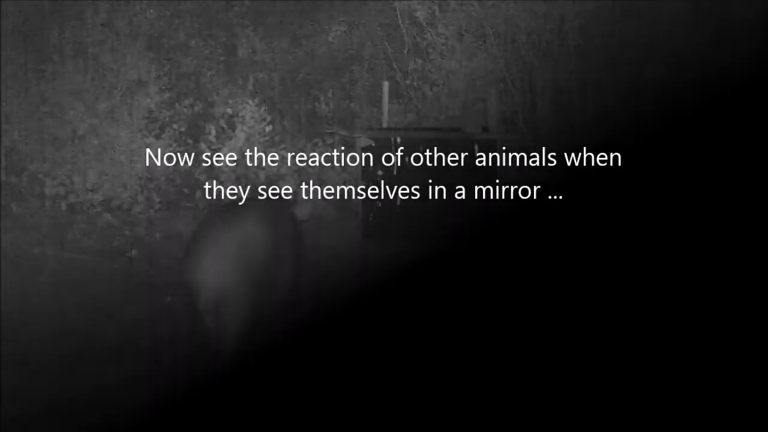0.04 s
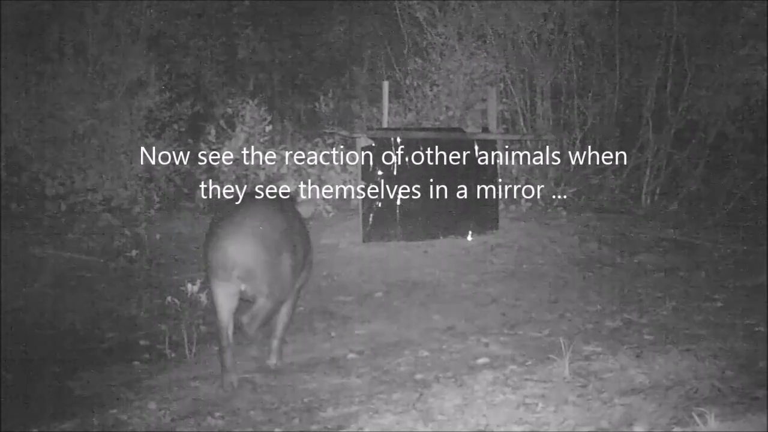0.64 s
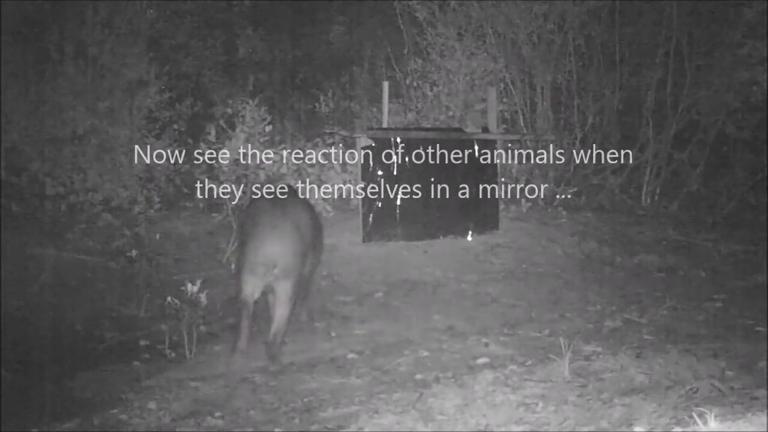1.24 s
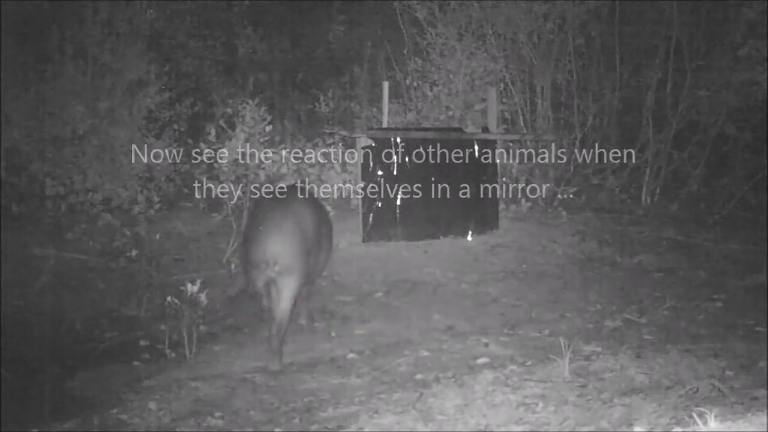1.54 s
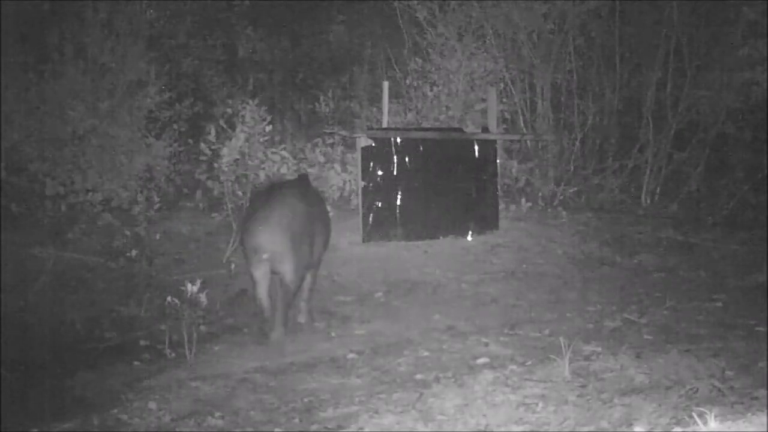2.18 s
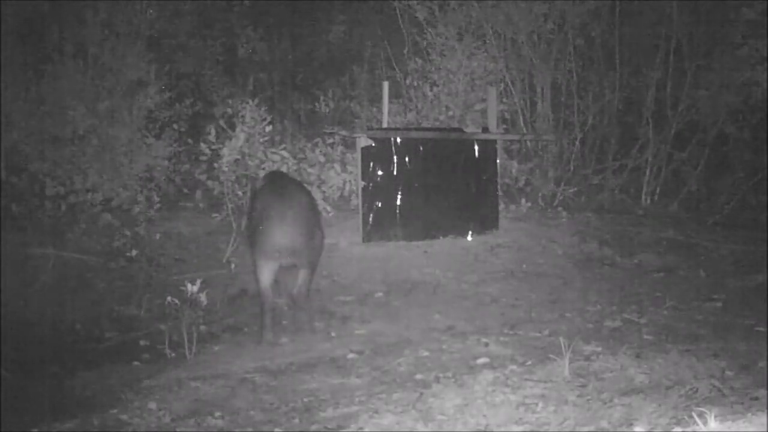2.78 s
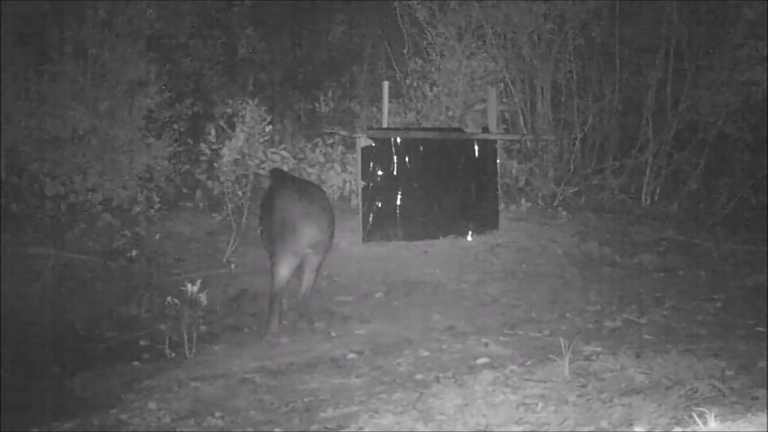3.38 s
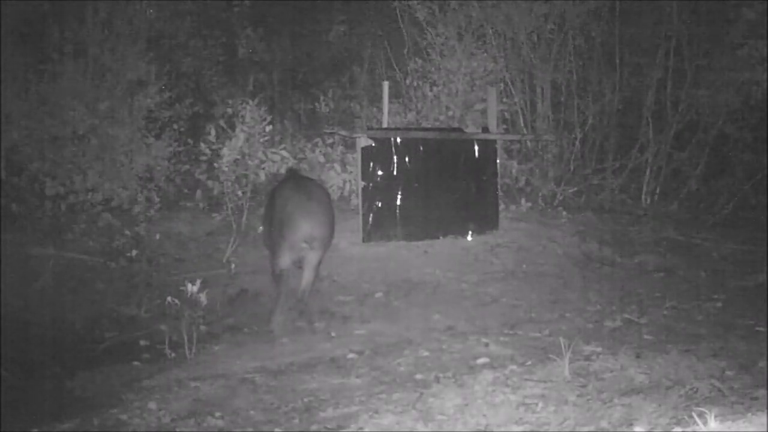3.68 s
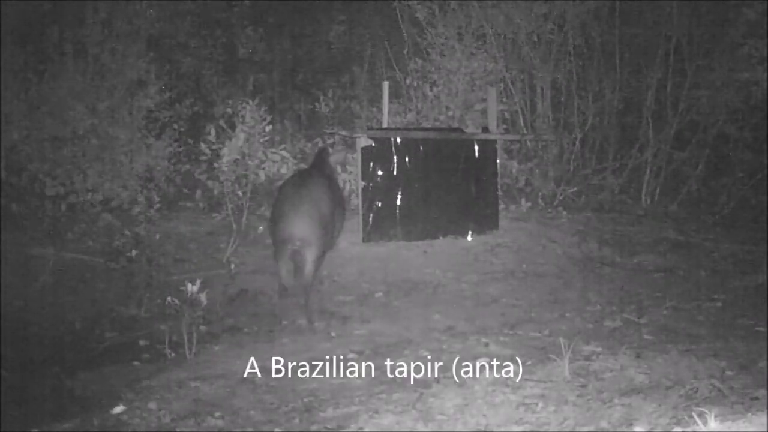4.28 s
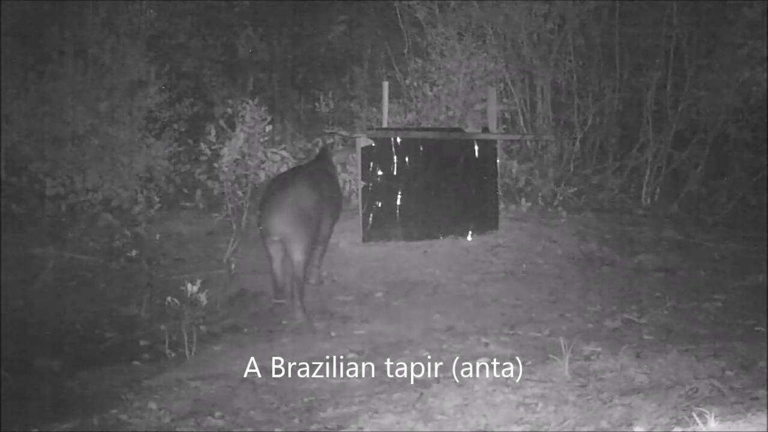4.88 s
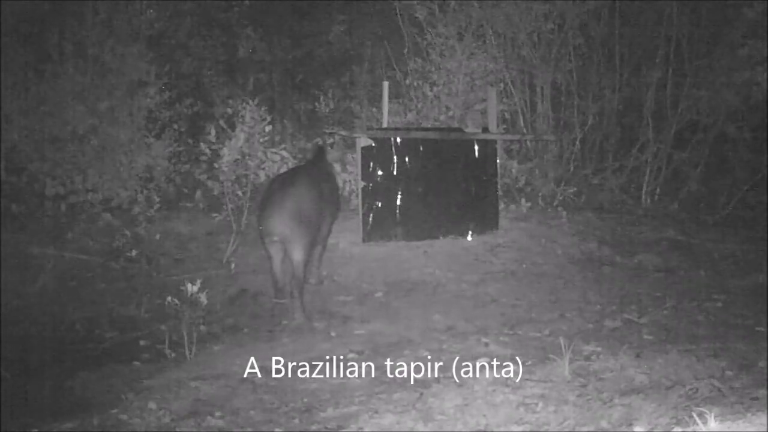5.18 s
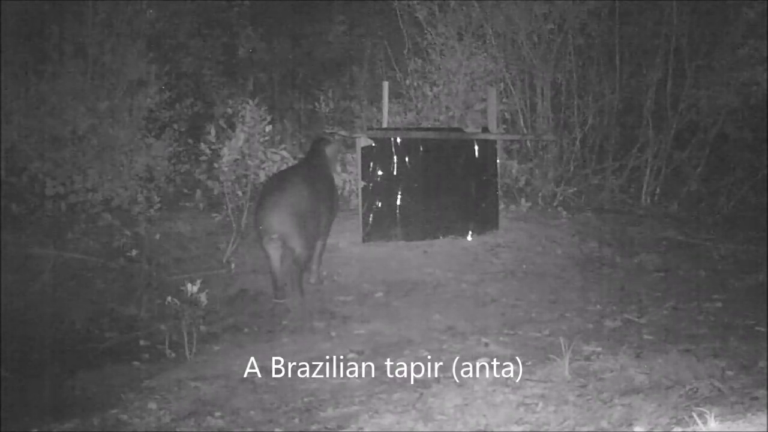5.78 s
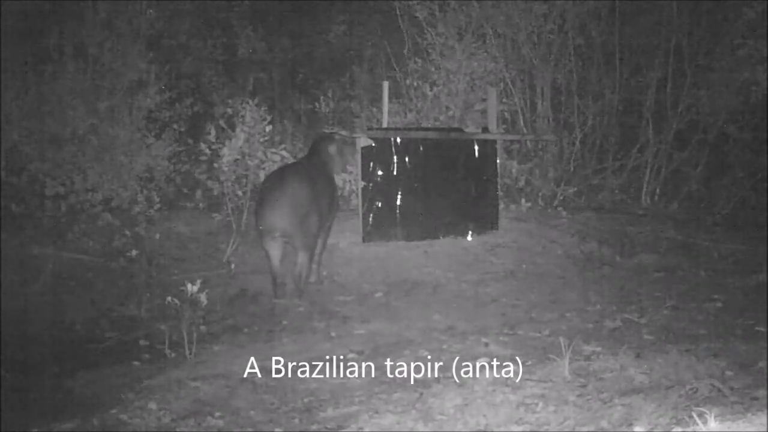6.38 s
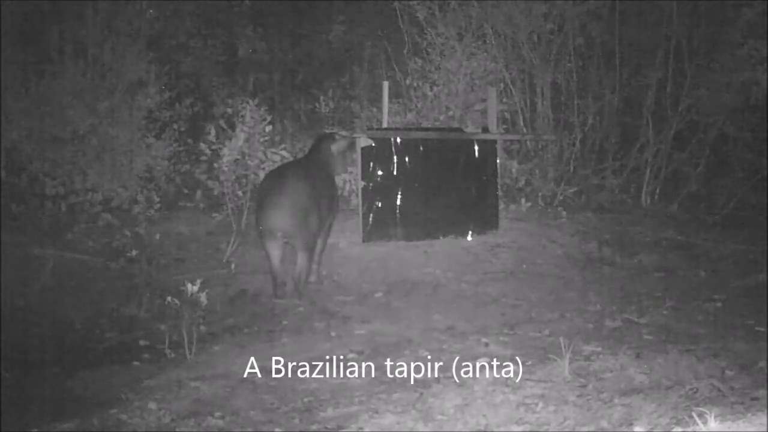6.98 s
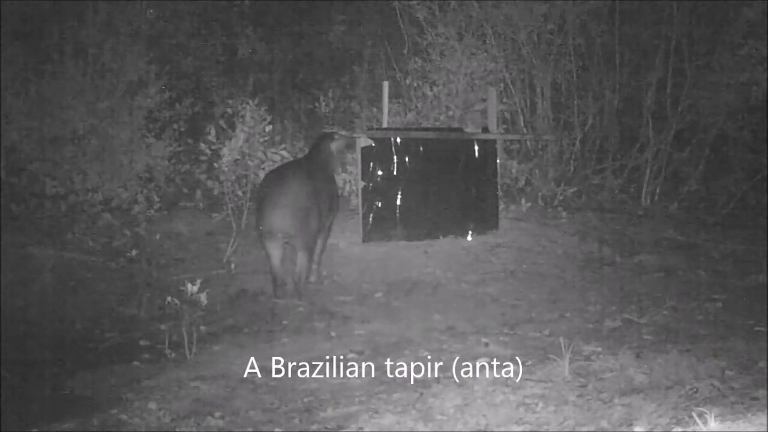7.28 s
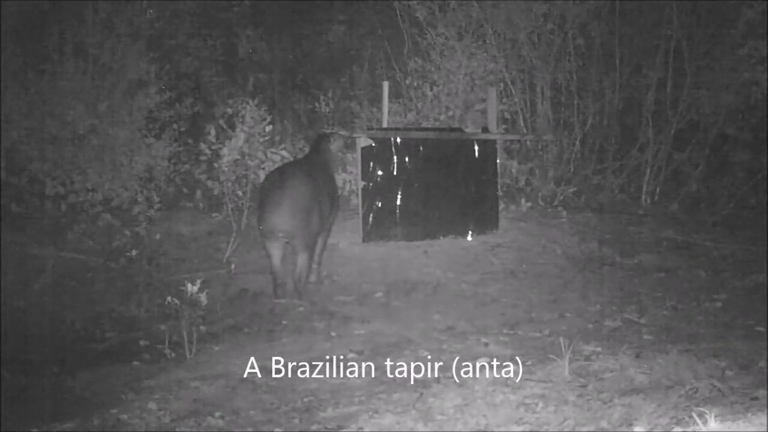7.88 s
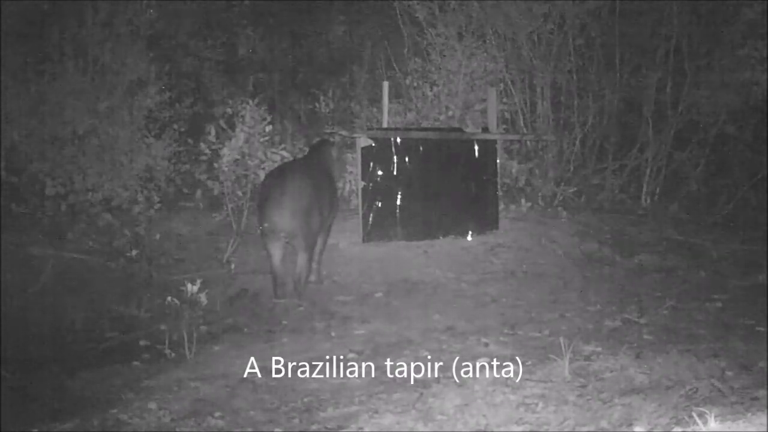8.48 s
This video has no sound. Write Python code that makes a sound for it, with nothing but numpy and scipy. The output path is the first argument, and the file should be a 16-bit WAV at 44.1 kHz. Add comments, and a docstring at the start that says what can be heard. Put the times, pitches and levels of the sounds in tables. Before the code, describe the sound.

A low, fast throbbing rumble with a little hum and hiss swells up on a stereo microphone in a forest at night and then holds steady. Above it, high crickets chirp and tick among the trees against a distant insect chorus. Soft animal steps barely crackle dry leaves near the start. Later a close cricket repeats brief high trills, and a few soft low thumps mark the rumble.

```python
"""Night forest, trail camera

The forest fades in on the camera's stereo microphone. Close by, a cricket scrapes its wings in short
rising trills; farther out others slur, chirp and tick over a distant chorus, and an animal treads
softly on dry leaves. The camera's own supply sags about 23 times a second, putting a low throb
under it all, with a faint hum, rumble and hiss."""
import sys
import numpy as np
from scipy import signal
from scipy.fft import rfft, irfft, next_fast_len
from scipy.io import wavfile
from scipy.ndimage import uniform_filter1d, map_coordinates

SR = 44100
rng = np.random.default_rng(int(sys.argv[2]) if len(sys.argv) > 2 else 0)


def dump(signal):
    """Clip the signal to [-1, 1] and save it as 16-bit WAV at the path in sys.argv[1]."""
    limited = np.clip(np.atleast_2d(signal).T, -1, 1)
    pcm = np.round(limited * 32767).astype(np.int16)
    wavfile.write(sys.argv[1], SR, pcm)


N = 385434

# Levels in all tables are relative.
# trills of the close cricket: first pulse t/s, last pulse t/s, level/dB, top f/Hz, rise t/s
NEAR_TRILLS = [(3.518, 3.686, -47.5, 6510, 0.14), (4.553, 4.849, -46.5, 6570, 0.11),
               (5.619, 5.757, -45, 6520, 0.078), (5.831, 5.973, -45.5, 6500, 0.043),
               (6.736, 7.066, -45, 6490, 0.053), (7.903, 8.217, -44, 6490, 0.053)]
# bouts the neighbours sing together: start t/s, end t/s, slurring level/dB, chirping level/dB
NEIGHBOUR_BOUTS = [(.56, 1.12, -53.5, -61), (1.31, 1.47, -54, -69), (1.58, 2.03, -54, -60),
                   (2.27, 2.85, -53.5, -63.5), (3.46, 3.7, -59, -57.5), (3.84, 4.14, -54, -60.5),
                   (4.32, 4.69, -55, -62), (5.13, 5.563, -54, -61), (5.72, 5.966, -55.5, -59.5),
                   (6.19, 6.6, -53.5, -63), (7.12, 7.46, -52, -58.5), (7.82, 8.42, -55.5, -59.5),
                   (8.62, 8.74, -53, -60)]
# songs of the low cricket: start t/s, end t/s
LOW_SONGS = [(1.7, 2.6), (4.2, 4.8), (7.05, 8.7)]
# spectrum of the distant insects: f/Hz, level/dB
CHORUS_SPECTRUM = [(2500, -40.5), (3500, -21), (4300, -13), (5000, -15), (5600, -6), (5950, 4),
                   (6300, -2.5), (6600, -2.5), (7000, 2.5), (7350, -10), (7600, -11), (8000, -50)]
# steps on dry leaves: t/s, level/dB, half-width t/s
LEAF_STEPS = [(0.179, -54, 0.0036), (.98, -62, 0.032), (1.16, -57, .004), (1.972, -63, 0.0027),
              (2.088, -66, 0.19)]
# reverberation among the trees: f/Hz, 60 dB decay t/s
FOREST_DECAY = [(500, 0.43), (6000, 0.17), (10000, 0.24)]
# the camera's heavier current draws, each a thump with a puff of hiss: t/s, level/dB
HEAVY_DRAWS = [(2.809, -56.5), (4.139, -59.5), (5.254, -62), (6.842, -59), (7.1, -54), (8.218, -57.5)]
# tones of the camera's hum: f/Hz, level/dB
HUM_TONES = [(124, -57), (163, -61.5), (188, -67), (226, -73), (248, -69.5), (280, -73)]
# spectrum of the rumble under the throb: f/Hz, level/dB
RUMBLE_SPECTRUM = [(8, -9.5), (20, 3), (40, 3.5), (80, -7.5), (110, -10.5), (160, -19.5), (220, -20.5),
                   (400, -44.5), (1000, -74)]
# spectrum of the camera's hiss: f/Hz, level/dB
HISS_SPECTRUM = [(150, -30.5), (250, -6), (338, -4.5), (854, -7.5), (1240, -14.5), (2030, -19),
                 (3110, -20.5), (5000, -19.5), (6500, -47), (11000, -120)]
# likeness of the noise in the two channels: f/Hz, left-right correlation
STEREO_LIKENESS = [(60, 1.0), (110, 1.0), (200, 0.98), (370, 0.73), (680, 0.54), (1250, 0.78), (2290, 0.79),
                   (4200, 0.73), (7700, 0.56)]
# the fade-in: t/s, forest and hiss level/dB, throb level/dB
FADE_IN = [(0, -16.5, -22), (.45, -17.5, -19.5), (.7, -12, -14.5), (1.1, -10, -13), (1.75, -9, -11),
           (2.05, -6, -5.5), (2.35, -2.5, -3.5), (2.6, 0, -0.3), (6, 0, 1)]


def near_cricket(rate=57.4, duty=.61, climb_hz=300, soft_db=4, droop_hz=60, wander_hz=14):
    """Close to the microphone: each trill climbs in pitch and strength as the wings get going."""
    t, out = clock(), np.zeros(N)
    wander = wander_hz * wobble(70)
    for first, last, db, top_hz, rise in NEAR_TRILLS:
        count = max(round((last - first) * rate), 1)
        span = (t > first - .5 / rate) & (t < last + .5 / rate)
        elapsed = t[span] - first
        stroke = elapsed / (last - first) * count
        within = np.clip((stroke - np.round(stroke)) / duty, -.5, .5)  # 0 at mid-stroke
        slack = np.clip(1 - elapsed / rise, 0, 1)  # 0 once the wings are going
        pitch = top_hz - climb_hz * slack - droop_hz * within + wander[span]
        level_db = db + 1.5 - soft_db * slack + .23 * wobble(46)[span]
        out[span] += amp(level_db) * np.cos(np.pi * within) * sine(pitch)
    return out


def wing_strokes(rate, duty, sung, unsteady=.04, scatter_db=2):
    """Loudness and progress (0-1) of strokes, rate a second; sung is the share that sound."""
    count = np.cumsum(rate * (1 + unsteady * wobble(6))) / SR + rng.random()
    chance = rng.random((4096, 2))
    size = (chance[:, 0] < sung) * amp(scatter_db * (2 * chance[:, 1] - 1))
    progress = np.clip(count % 1 / duty, 0, 1)
    return size[count.astype(int)] * np.sqrt(np.abs(np.sin(np.pi * progress))), progress


def cricket(hz, sweep_hz, rate, duty, sung, waver_hz):
    """The wing rings while the scraper runs over the file; its pitch slides through each stroke."""
    loudness, progress = wing_strokes(rate, duty, sung)
    return unit(loudness * sine(hz + sweep_hz * (progress - .5) + waver_hz * wobble(45)))


def slurring_crickets():
    """Two neighbours farther out: one slurs upward, one holds a lower note; distant ones join in."""
    rising = cricket(5995, sweep_hz=140, rate=15.2, duty=.62, sung=.9, waver_hz=28)
    holding = cricket(5895, sweep_hz=-25, rate=14.3, duty=.75, sung=.75, waver_hz=17)
    far = noise([(4600, -51), (5200, -12.5), (5600, -7), (5950, -.5), (6250, -6), (6500, -39)])
    return amp(-6.5 + .75 * wobble(11)) * rising + amp(-7 + .69 * wobble(12)) * holding + amp(-6) * far


def chirping_crickets():
    """A slightly higher pair of neighbours chirps in shorter strokes."""
    upper = cricket(6280, sweep_hz=30, rate=14.6, duty=.5, sung=.8, waver_hz=22)
    lower = cricket(6150, sweep_hz=170, rate=15.8, duty=.5, sung=.7, waver_hz=26)
    return amp(-3.5) * upper + amp(-6.5) * lower


def bout_loudness(attack_s=.1, release_s=.15, slur_lull_db=-60.5, chirp_lull_db=-65):
    """The slurring and chirping pairs swell together, hold, and die back to a lull of stragglers."""
    t, lull = clock(), amp([[slur_lull_db], [chirp_lull_db]])
    loudness = lull * np.ones(N)
    for start, end, slur_db, chirp_db in NEIGHBOUR_BOUTS:
        swell = np.clip((t - start) / attack_s, 0, 1) * np.clip(1 - (t - end) / release_s, 0, 1)
        loudness += swell * (amp([[slur_db], [chirp_db]]) - lull)
    return loudness


def ticking_cricket(gap_s=.017, phrase_s=.58, rest_s=.079):
    """A high cricket gives short double ticks and rests about twice a second."""
    tick, _ = wing_strokes(rate=18.8, duty=.14, sung=.95, unsteady=.12)
    second_size = amp(1.8 * wobble(11))
    second_tick = np.interp(clock() - gap_s * (1 + .1 * wobble(7.3)), clock(), tick)
    pair = tick + second_size * second_tick
    phrase_time = np.cumsum(1 + .3 * wobble(1.8)) / SR % phrase_s
    singing = phrase_time < phrase_s - rest_s
    return amp(-65.5) * unit(pair * singing * sine(7235 + 10 * wobble(30)))


def faint_crickets():
    """Far from the microphone a thin trill runs on; a lower cricket comes and goes."""
    thin = cricket(6882, sweep_hz=10, rate=57, duty=.95, sung=.8, waver_hz=20)
    low = cricket(4878, sweep_hz=30.7, rate=28, duty=.9, sung=.75, waver_hz=26.3)
    singing = sum((clock() > start) & (clock() < end) for start, end in LOW_SONGS)
    low_swell = uniform_filter1d(singing * 1., size=6000)
    return amp(-68 + 2.1 * wobble(.91)) * thin + amp(-78) * low_swell * low


def far_chorus():
    """Countless distant insects merge into a shimmering band that flutters at their wing rate."""
    flutter_db = 1.9 * sine(57 * (1 + .045 * wobble(10)))
    shimmer_db = .98 * wobble(3.6) + 1.8 * wobble(70)
    return amp(-55.5 + shimmer_db + flutter_db) * noise(CHORUS_SPECTRUM)


def leaf_steps():
    """On the forest floor, soft steps crush dry leaves in brief puffs of crackle."""
    press = sum(amp(db) * bump(s, width) for s, db, width in LEAF_STEPS)
    crackle = amp(3.1 * wobble(400))
    rustle = noise([(200, -26), (800, -2), (2000, -3), (4300, 2.5), (6000, -1), (9000, -20)])
    return press * unit(crackle * rustle)


def forest_reverb(song):
    """Trunks and leaves scatter the song differently to each side of the microphone."""
    hz, t, scatter = signal.stft(rng.standard_normal((2, SR // 2)), SR, nperseg=256)
    decay = amp(-60 * t / along(FOREST_DECAY, hz)[:, None])
    _, tail = signal.istft(scatter * decay, SR, nperseg=256)
    return signal.fftconvolve(song, tail / np.linalg.norm(tail[0]), axes=1)[:, :N]


def frame_load(frame_hz=23.296, width_s=.00932, late_every=6.7, late_s=.0085):
    """The camera draws current once a frame, every few frames late, with smaller draws in between."""
    frame = np.arange(int(N / SR * frame_hz) + 1)
    slip, lag, extra_lag, length, extra_length, extra_chance, size = rng.random((len(frame), 7)).T
    delayed = (frame + 1.2 * slip) % late_every < 1
    onsets = .0107 + frame / frame_hz + delayed * late_s * (.3 + .7 * lag)
    starts = np.concatenate([onsets, onsets + extra_lag / frame_hz])
    ends = starts + width_s * np.concatenate([1 + .29 * (length - .5), .4 + .65 * extra_length])
    sizes = np.concatenate([1 + .2 * (size - .5), .36 * (extra_chance < .45)])
    edges = lambda times: np.bincount((times * SR).astype(int), sizes, N + SR)[:N]
    return np.cumsum(edges(starts) - edges(ends))


def surges(width_s):
    """The strength of the camera's occasional heavier draws."""
    return sum(amp(db) * bump(s, width_s) for s, db in HEAVY_DRAWS)


def camera_throb(load, sag_hz=42, smooth_hz=210, coupling_hz=7):
    """Each draw makes the supply sag: a low thump, over hum and rumble."""
    highpass = lambda hz: 1j * hz / (coupling_hz + 1j * hz)
    supply = lambda hz: highpass(hz) / (1 + 1j * hz / sag_hz) / (1 + 1j * hz / smooth_hz)
    thumps = -filtered(amp(-22) * load + amp(29) * surges(width_s=.0068), supply)
    hum = sum(amp(db - 1.5 + 3 * wobble(9)) * sine(hz + 2 * wobble(6)) for hz, db in HUM_TONES)
    return thumps + hum + amp(-44) * noise(RUMBLE_SPECTRUM)


def camera_hiss(load, split_hz=1700):
    """The noise floor: its dull part lifts with each draw, its bright part stays even."""
    lift_db = (3.5 + 1.4 * wobble(23)) * uniform_filter1d(load, size=200)
    pulsing = amp(-61 + lift_db + .6 * wobble(13))
    lowpass = lambda hz: 1 / np.sqrt(1 + (hz / split_hz) ** 4)
    highpass = lambda hz: np.sqrt(1 - lowpass(hz) ** 2)
    puff = noise([(60, -7), (200, -.5), (450, -3.5), (900, -10.5), (1600, -28), (4000, -42)])
    dull = filtered(pulsing * noise(HISS_SPECTRUM), lowpass)
    bright = amp(-59) * filtered(noise(HISS_SPECTRUM), highpass)
    return dull + bright + amp(5) * surges(width_s=.0088) * puff


def amp(db):
    """Decibels to amplitude."""
    return 10 ** (np.asarray(db) / 20)


def unit(x):
    """x scaled to rms 1."""
    return x / np.sqrt(np.mean(x ** 2) + 1e-20)


def clock():
    """The time of each sample."""
    return np.arange(N) / SR


def bump(centre_s, width_s):
    """A bell-shaped pulse."""
    return np.exp(-((clock() - centre_s) / width_s) ** 2)


def along(points, hz):
    """Read (f/Hz, value) points on a log axis."""
    f, v = np.transpose(points)
    return np.interp(np.log(hz + 1), np.log(f + 1), v)


def wobble(rate):
    """A smooth random curve, rate knots a second."""
    return map_coordinates(rng.standard_normal(int(N * rate / SR) + 4), [clock() * rate])


def sine(hz):
    """A tone that follows a pitch curve."""
    return np.sin(2 * np.pi * (np.cumsum(hz) / SR + rng.random()))


def filtered(x, response):
    """x through a complex frequency response."""
    size = next_fast_len(N + SR // 2)
    return irfft(rfft(x, size) * response(np.fft.rfftfreq(size, 1 / SR)), size)[..., :N]


def noise(spectrum):
    """Mid-side noise of rms 1, shaped by (f/Hz, level/dB) points, as left and right."""
    angle = lambda hz: np.arccos(np.clip(along(STEREO_LIKENESS, hz), -1, 1)) / 2
    colour = lambda hz: amp(along(spectrum, hz)) * [np.cos(angle(hz)), np.sin(angle(hz))]
    mid, side = filtered(rng.standard_normal((2, N)), colour)
    return unit(np.array([mid + side, mid - side]))


def scene():
    """One cricket close and nearly dry, the rest back among the trees; the throb has its own fade-in."""
    near = near_cricket()
    slur_loudness, chirp_loudness = bout_loudness()
    neighbours = slur_loudness * slurring_crickets() + chirp_loudness * chirping_crickets()
    others = neighbours + faint_crickets() + ticking_cricket()
    insects = near + others + forest_reverb(amp(-17) * near + amp(-7.5) * others) + far_chorus()
    load = frame_load()
    ambience = insects + leaf_steps() + camera_hiss(load)
    times, ambience_db, throb_db = np.transpose(FADE_IN)
    fade = lambda db: amp(np.interp(clock(), times, db))
    return fade(ambience_db) * ambience + fade(throb_db) * camera_throb(load)


def record(dry):
    """The camera keeps nothing above its band limit."""
    limit_hz = 7410
    return filtered(dry, lambda hz: 1 / np.sqrt(1 + (hz / limit_hz) ** 200))


dry = scene()
out = record(dry)
dump(out)
```